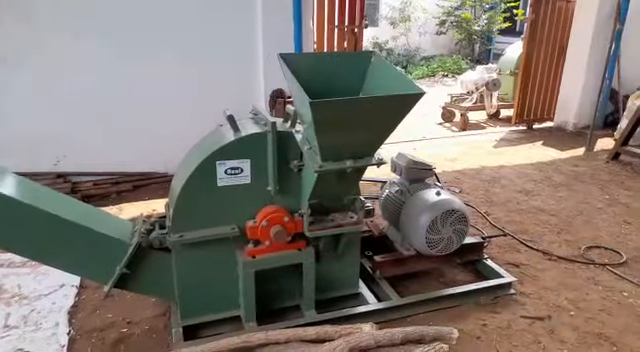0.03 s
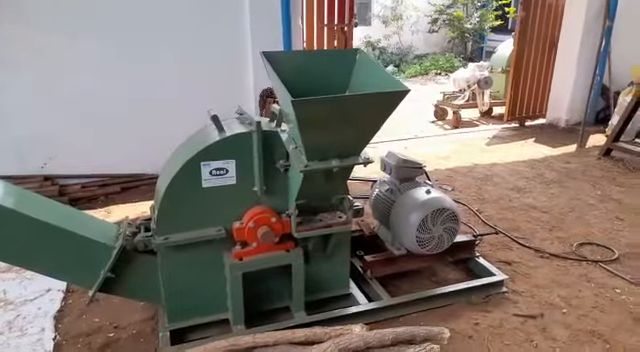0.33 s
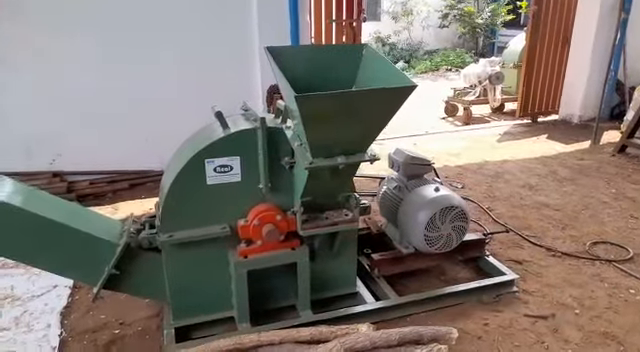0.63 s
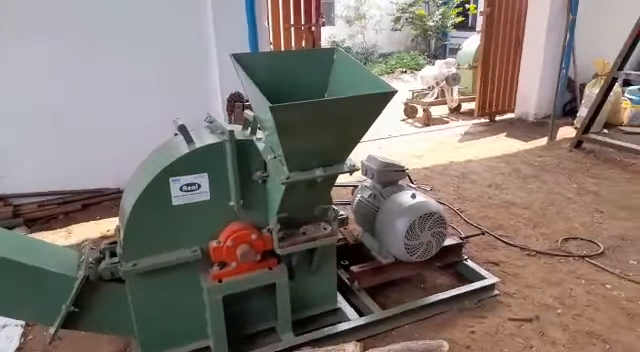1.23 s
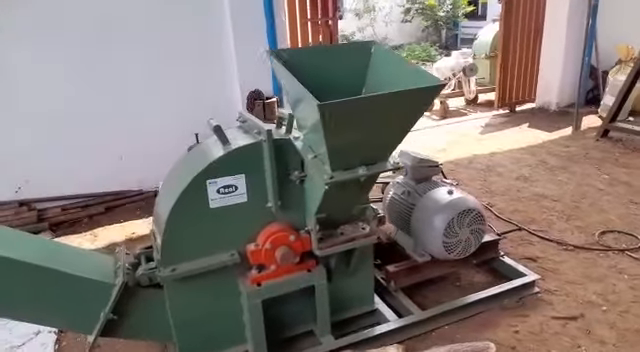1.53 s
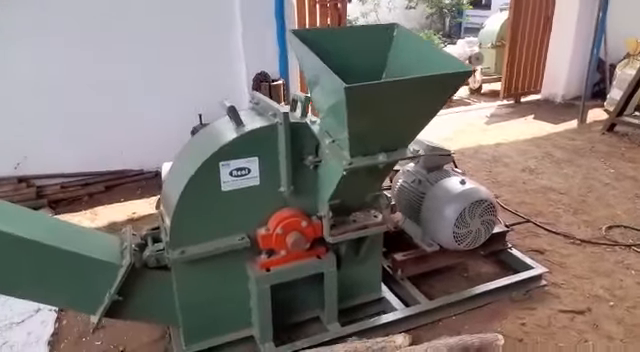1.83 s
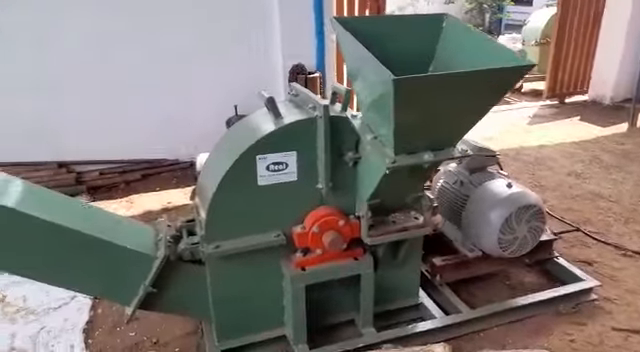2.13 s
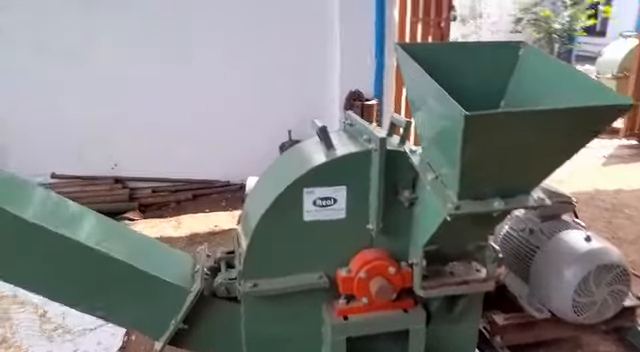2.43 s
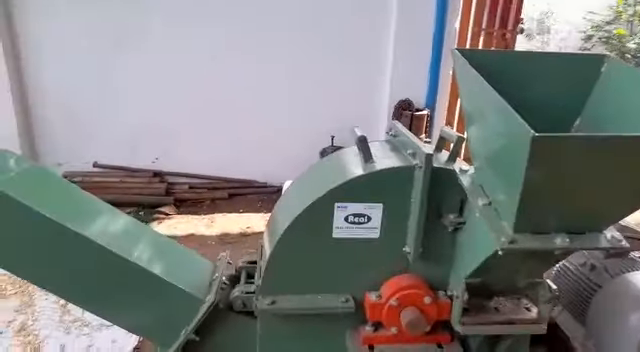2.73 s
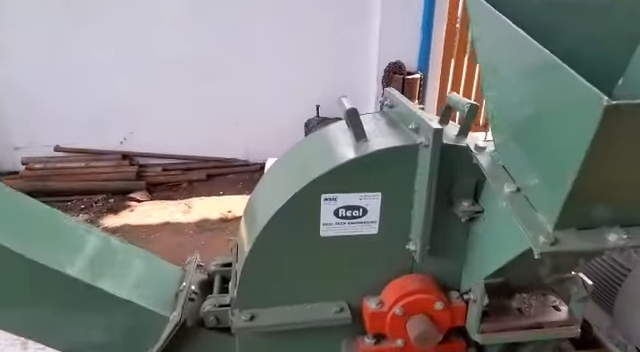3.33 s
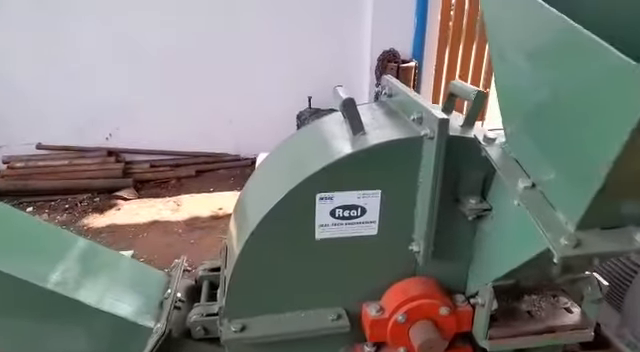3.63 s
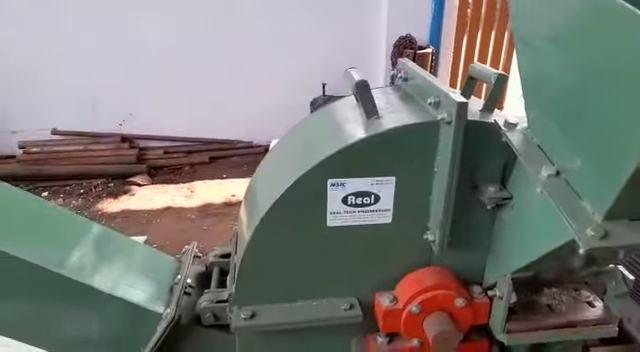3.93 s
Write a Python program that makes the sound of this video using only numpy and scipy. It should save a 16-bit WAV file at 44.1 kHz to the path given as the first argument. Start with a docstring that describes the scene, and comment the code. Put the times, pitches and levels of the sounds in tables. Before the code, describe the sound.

An idling wood crusher buzzes and hums without a break outdoors, with a rush of air and short wall echoes. Its pitch sinks slightly while whining, ringing overtones come and go and the microphone approaches.

```python
"""A throbbing, buzzing drone over rushing air: a belt-driven wood crusher runs empty in a walled yard.
Each rotor blade sends a sharp pressure dip through the steel housing, whose resonances swell as the
rotor slowly loses speed and its harmonics slide past. Shaft and belt hum, the casing booms, and a
bright tick and a puff of hiss ride on every blade. As the listener walks up, overtones whine and fade
and single panels ring out, while the walls echo the pulses and scatter the treble."""
import sys
import numpy as np
from scipy import signal
from scipy.fft import rfft, irfft
from scipy.io import wavfile
from scipy.ndimage import uniform_filter1d, minimum_filter1d, map_coordinates

SR = 44100
rng = np.random.default_rng(int(sys.argv[2]) if len(sys.argv) > 2 else 0)


def generate_wav(signal):
    """Clip the signal to [-1, 1] and save it as 16-bit WAV at the path in sys.argv[1]."""
    frames = np.transpose(np.atleast_2d(signal))
    scaled = np.clip(frames, -1, 1) * 32767
    pcm = np.round(scaled).astype(np.int16)
    wavfile.write(sys.argv[1], SR, pcm)


N = 176400
T = np.arange(N) / SR
FFT_SIZE = 65536
FREQS = np.arange(FFT_SIZE // 2 + 1) * SR / FFT_SIZE
BLADES, BLADE_HZ, SAG_HZ_PER_S, FIRST_PASS_S = 2, 64.23, 1.296, .0074

# All levels are relative: the walk's level rides the whole mix.
# the walk up to the machine (t/s, nearness 0-1, level/dB)
WALK_UP = [(0, 0, -0.5), (.6, 0.13, 0.5), (1.3, 0, 0.67), (2.1, 0, -0.5), (2.6, 0.27, 0), (3.2, 0.67, 1.53),
           (4, 0.98, -0.5)]
# tone of the direct blade pulses (f/Hz, level/dB)
BLADE_COLOUR = [(30, -44), (60, -31.5), (125, -25), (185, -28.5), (260, -28), (420, -26.5), (500, -24.5),
                (620, -28.5), (900, -44), (1400, -44), (2300, -54.5), (3400, -65.5), (4800, -75),
                (6500, -91), (10000, -102)]
# peaks and notches of housing and chute (f/Hz, width/Hz, level/dB)
HOUSING_MODES = [(254.2, 12.5, 12), (302.8, 3, -13.5), (304.3, 11.1, 13), (319.5, 2.5, -3), (357.1, 4.9, 9),
                 (380.2, 5.1, 6.5), (457, 16, 15), (477.8, 3.5, 5), (515.8, 7.2, -14), (568.3, 10.5, -18.5),
                 (573.2, 16, 12), (600, 37.4, -11), (615.1, 16.3, 14), (694, 8, 6.5), (730, 12, 5),
                 (779, 3, -15.5), (793, 6.7, -0.5), (915, 4.6, -4.5), (1112, 75, 2)]
# EQ on the direct pulses close to the machine (f/Hz, level/dB)
CLOSE_EQ = [(60, 7.5), (125, 4), (185, 7.5), (250, 6.5), (320, -12.5), (370, 3.5), (430, 3), (490, -1),
            (680, 0.5), (950, -2), (1500, 2.5), (2300, -9.5), (4000, -11)]
# hum of shaft and belt (multiple of the rotor speed, far level/dB, near level/dB)
DRONE_PARTIALS = [(3, -33.5, -41.5), (5, -35.5, -30), (7, -32.5, -30), (7.5, -37.5, -29.5),
                  (8.5, -31, -30.5), (9, -31.5, -25), (9.5, -52, -40), (10.5, -38.5, -32.5),
                  (11, -48.5, -40.5), (13, -35.5, -28.5), (15, -36.5, -60), (19, -45.5, -30)]
# tone of the rushing air (f/Hz, level/dB)
AIR_COLOUR = [(25, -23), (80, -6.5), (180, 4.5), (300, 0.5), (420, -2), (650, -5.5), (1000, -8.5),
              (1500, -12), (2300, -14), (3300, -27), (4600, -25), (6300, -40), (9000, -45), (10500, -51.5),
              (13500, -47), (16000, -59)]
# resonances of the hollow casing (f/Hz, width at -6 dB/Hz, level/dB)
CAVITY_MODES = [(123.8, 13.6, -28.5), (259, 25, -34)]
# fader of the blade tick (t/s, level/dB)
TICK_FADER = [(0, -55), (1.3, -58), (2.45, -55), (2.95, -49.5), (3.4, -51.5), (4, -49.5)]
# fader of the gritty hiss (t/s, level/dB)
GRIT_FADER = [(0, -69), (.15, -56), (.27, -65.5), (.47, -58.5), (.62, -69), (1.7, -67.5), (2.4, -62),
              (2.9, -61.5), (3.25, -64), (3.5, -68), (4, -64)]
# tone of that hiss (f/Hz, level/dB)
GRIT_EQ = [(2000, -21.5), (6000, -3), (9000, 2.5), (10500, -3.5), (12500, -2), (15700, -7.5)]
# tone of the pulses scattered by panels and walls (f/Hz, level/dB)
SCATTER_COLOUR = [(40, -71.5), (120, -52), (250, -46.5), (420, -36), (650, -41), (1000, -38.5),
                  (1400, -42.5), (2300, -46), (3300, -58), (4700, -62.5), (6500, -77.5), (10000, -100)]
# slap off the wall along the walk (t/s, delay/s, level/dB)
SLAP_PATH = [(0, .0087, -11.5), (1.3, 0.0097, -6), (2.4, .0105, -4.5), (3.0, .0117, 2), (3.4, .0121, 0.5),
             (4, 0.013, 2)]
# tone of that slap (f/Hz, level/dB)
SLAP_COLOUR = [(100, -67), (400, -46.5), (800, -43.5), (1300, -45), (1900, -51), (2600, -52.5),
               (4000, -83.5), (10000, -105)]
# blade overtones that swell into a whine (peak t/s, rough f/Hz, fade to 1/e in s, level/dB)
WHINE_SWELLS = [(0.105, 1154, 0.28, -36), (0.304, 1915, 0.29, -38), (0.348, 2745, 0.46, -45.5),
                (.45, 764, 0.85, -32.5), (.75, 1202, .4, -35.5), (0.847, 1010, 0.28, -37.5),
                (1.09, 2324, 0.16, -37.5), (1.16, 1316, 0.25, -50), (1.24, 688, 0.31, -27.5),
                (1.23, 2380, 0.065, -43.5), (1.264, 1126, .5, -33.5), (1.398, 1185, 0.14, -39.5),
                (1.427, 1746, 0.53, -38.5), (1.542, 1683, 0.2, -36), (1.7, 867, .22, -28.5),
                (2.02, 1232, 0.24, -46), (2.138, 1353, 0.35, -30), (2.146, 430, 1, -34.5),
                (2.598, 791, 0.11, -36), (2.71, 1032, 0.16, -35.5), (2.684, 1581, 0.11, -35),
                (2.904, 1693, 0.13, -38), (3.34, 1677, .15, -36), (3.87, 1362, .14, -34.5),
                (3.867, 1125, 0.17, -34), (3.384, 957, 0.38, -35), (3.374, 1256, 0.38, -34.5),
                (3.657, 892, 0.43, -27.5)]
# ringing panels (peak t/s, f/Hz, width/Hz, fade to 1/e in s, level/dB, share of air noise 0-1)
PANEL_SWELLS = [(0.201, 3160, 900, 0.42, -42.5, 0.5), (1.15, 2346, 70, 0.18, -39.5, 0),
                (1.505, 2420, 110, 0.097, -39, 0), (1.92, 4600, 460, .22, -46, 0.4),
                (3.003, 4780, 398, .3, -52, .25), (2.595, 804, 330, 0.18, -28.5, 0.7),
                (2.952, 1170, 400, 0.34, -30, 0.5), (3.05, 2590, 119, .22, -41, .12),
                (3.13, 2350, 130, 0.12, -48, 0.5), (3.494, 2520, 131, .13, -41.5, 0.2),
                (3.877, 2380, 170, .16, -36.5, 0.5)]


def amp(db):
    """Decibels to gain."""
    return 10 ** (np.asarray(db) / 20)


def unit(x):
    """Scale to rms 1."""
    return x / np.sqrt(np.mean(x ** 2))


def curve(table, column=1):
    """One column of a time table at every sample."""
    rows = np.array(table)
    return np.interp(T, rows[:, 0], rows[:, column])


def eq(points):
    """Decibels at every frequency, from points on a log axis."""
    rows = np.array(points)
    return np.interp(np.log(FREQS + 1), np.log(rows[:, 0]), rows[:, 1])


def bell(hz, width_hz):
    """Resonance curve: 1 at its centre, a half at the edges of its width."""
    return 1 / (1 + ((FREQS - hz) / (width_hz / 2)) ** 2)


def response(db):
    """Minimum-phase impulse response of an EQ curve."""
    cepstrum = irfft(np.log(amp(db)))
    cepstrum[1:FFT_SIZE // 2] *= 2
    cepstrum[FFT_SIZE // 2 + 1:] = 0
    return irfft(np.exp(rfft(cepstrum)))[:FFT_SIZE // 2]


def through(x, ir):
    """Filter a sound, keeping the last N samples so that any pre-roll drops away."""
    return signal.fftconvolve(x, ir)[len(x) - N:len(x)]


def noise(db):
    """Steady noise with the given colour."""
    return through(rng.standard_normal(N + FFT_SIZE // 2), response(db))


def wander(hz):
    """Smooth random motion with a spread near 1."""
    steps = rng.standard_normal(256)
    return map_coordinates(steps, [T * hz + 2], order=3, mode="mirror")


def swell(peak_s, fade_s):
    """Bell-shaped fade in and out."""
    return np.exp(-((T - peak_s) / fade_s) ** 2)


def passes(t):
    """Number of blade passes so far, as the rotor slows."""
    return BLADE_HZ * (t - FIRST_PASS_S) - SAG_HZ_PER_S * t ** 2 / 2


def blade_pulses(spread_db=0.12):
    """A pressure dip per blade, with a second of pre-roll; and the same train with alternating sign."""
    phase = passes(np.arange(-SR, N) / SR)
    number = np.arange(np.ceil(phase[0]) + 1, np.floor(phase[-1]) + 1)
    at = np.interp(number, phase, np.arange(len(phase)))
    dips = -amp(spread_db * rng.standard_normal(len(at))) * SR / BLADE_HZ / np.sqrt(2)
    signs = np.array([np.ones(len(at)), (-1) ** number])
    trains = np.zeros((2, len(phase) + 1))
    for step, share in ((0, 1 - at % 1), (1, at % 1)):  # each dip straddles two samples
        trains[:, at.astype(int) + step] += share * dips * signs
    return trains[:, :-1]


def housing(pulses):
    """The pulses ring the steel housing; the bass fattens close to the machine."""
    colour = eq(BLADE_COLOUR) + sum(db * bell(hz, width) for hz, width, db in HOUSING_MODES)
    far = through(pulses, response(colour))
    close = through(pulses, response(colour + eq(CLOSE_EQ)))
    nearness = curve(WALK_UP)
    return (1 - nearness) * far + nearness * close


def chute(x, hz=333, width_hz=31):
    """One band lingers in the chute and comes out late, at the same level."""
    b, a = signal.iirpeak(hz, hz / width_hz, fs=SR)
    return x - 2 * signal.lfilter(b, a, x)


def belt_drone(waver_db=0.3, waver_hz=1.4):
    """Shaft and belt hum in wavering partials between the blade harmonics."""
    turns, nearness, out = passes(T) / BLADES, curve(WALK_UP), 0
    for multiple, far_db, near_db in DRONE_PARTIALS:
        db = far_db + (near_db - far_db) * nearness + waver_db * wander(waver_hz)
        out += np.sqrt(2) * amp(db) * np.sin(2 * np.pi * multiple * turns)
    return out


def air_rush(level_db=-27.5, surge_depth=0.13, wide_above_hz=700):
    """Air rushes through the casing, surging with each blade; the treble is wide."""
    colour = eq(AIR_COLOUR)
    mid = noise(colour)
    side = noise(colour - 10 * np.log10(1 + (wide_above_hz / (FREQS + 1)) ** 2))
    surge = 1 + surge_depth * np.cos(2 * np.pi * passes(T))
    return amp(level_db) * unit(np.array([mid + side, mid - side]) * surge)


def cavity_boom(close_db=-1):
    """Turbulence booms in the hollow casing, a touch softer close up."""
    boom = 0
    for hz, width_hz, db in CAVITY_MODES:
        band = noise(20 * np.log10(bell(hz, width_hz) + 1e-6))
        boom += amp(db) * unit(band)
    return boom * amp(close_db * curve(WALK_UP))


def blade_ticks(pulses, hz=4680, width_hz=1440, flicker_db=1.5, left_over_right_db=10):
    """A bright metallic tick off to the left as each blade passes, never twice the same strength."""
    ring = response(40 * np.log10(bell(hz, width_hz)))  # width at -12 dB
    ticks = unit(through(pulses, ring) * amp(flicker_db * wander(BLADE_HZ)))
    pan = amp(np.array([[1], [-1]]) * left_over_right_db / 2)
    return amp(curve(TICK_FADER)) * ticks * pan


def grit(grain_spread_db=5.5, puff_height=1.2, puff_decay_passes=.25):
    """Fine grainy hiss, like dust blown through the casing, in a puff after each blade."""
    grains = rng.standard_normal((2, N)) * amp(grain_spread_db * rng.standard_normal(N))
    puff = 1 + puff_height * np.exp(-(passes(T) % 1) / puff_decay_passes)
    colour = response(eq(GRIT_EQ))
    hiss = np.array([through(ear * puff, colour) for ear in grains])
    return amp(curve(GRIT_FADER)) * unit(hiss)


def yard_scatter(pulses, spots=5, spot_s=1.33, decay_s=0.045):
    """Dense short reflections off panels and walls, different at each ear and each spot of the walk."""
    age, out = T[:FFT_SIZE // 8], np.zeros((2, N))
    coloured = signal.fftconvolve(pulses, response(eq(SCATTER_COLOUR)))[:len(pulses)]
    place = np.minimum(T / spot_s, spots - 1)
    for spot in range(spots):
        crossfade = np.cos(np.pi / 2 * np.clip(place - spot, -1, 1))
        for ear in range(2):
            tail = rng.standard_normal(len(age)) * np.exp(-age / decay_s)
            out[ear] += crossfade * through(coloured, tail / np.linalg.norm(tail))
    return out


def wall_slap(pulses):
    """Each blade pulse slaps back off the wall; the delay slides as the listener walks."""
    slap = through(pulses, response(eq(SLAP_COLOUR)))
    late = map_coordinates(slap, [(T - curve(SLAP_PATH)) * SR], order=1, mode="nearest")
    return -late * amp(curve(SLAP_PATH, column=2))


def whines():
    """Single blade overtones sing out for a moment as the speed and the listening spot change."""
    phase, out = passes(T), 0
    for peak_s, hz, fade_s, db in WHINE_SWELLS:
        harmonic = np.round(hz / (BLADE_HZ - SAG_HZ_PER_S * peak_s))
        tone = np.sqrt(2) * np.sin(-2 * np.pi * harmonic * phase)
        out += amp(db) * swell(peak_s, fade_s) * tone
    return out


def panel_rings(pulses):
    """Blades and turbulence ring single panels, each loudest as the listener passes its sweet spot."""
    drive, out = np.vstack([pulses[-N:], rng.standard_normal((2, N))]), 0
    for peak_s, hz, width_hz, fade_s, db, air_share in PANEL_SWELLS:
        b, a = signal.iirpeak(hz, hz / width_hz, fs=SR)
        rung = signal.lfilter(b, a, signal.lfilter(b, a, drive + 1e-18))
        struck, blown = unit(rung[0]), unit(rung[1:])
        panel = np.sqrt(1 - air_share) * struck + np.sqrt(air_share) * blown
        out += amp(db) * swell(peak_s, fade_s) * panel
    return out


def lean_right(x, right_over_left_db=2.5, above_hz=140):
    """Pan a little to the right, leaving the bass in the centre."""
    upper = signal.sosfilt(signal.butter(1, above_hz, "high", fs=SR, output="sos"), x)
    pan = amp(np.array([[-1], [1]]) * right_over_left_db / 2)
    return x + upper * (pan - 1)


def turn_away(stereo, turn_s=(2.05, 2.8), lag_s=.00018):
    """The listener turns, putting the machine to the right, so the left ear hears it late."""
    lag = np.interp(T, turn_s, [0, lag_s])
    left = map_coordinates(stereo[0], [(T - lag) * SR], order=3, mode="nearest")
    return np.array([left, stereo[1]])


def scene(blade_mismatch_db=-7.5):
    """The crusher and its yard in stereo, heard along the walk."""
    pulses, alternating = blade_pulses()
    buzz = chute(housing(pulses) + whines())
    machine = lean_right(buzz + belt_drone() + cavity_boom() + wall_slap(pulses))
    # the two blades are not alike, so the reflections throb once a turn
    yard = yard_scatter(pulses) + amp(blade_mismatch_db) * yard_scatter(alternating)
    mix = machine + yard + blade_ticks(pulses) + air_rush() + panel_rings(pulses) + grit()
    return turn_away(mix) * amp(curve(WALK_UP, column=2))


def record(dry, top_hz=15700):
    """A fast limiter catches the peaks, then a steep low-pass shaves off the top."""
    peak = np.abs(dry).max(axis=0)
    needed = np.minimum(1, 1 / (peak + 1e-9))
    held = minimum_filter1d(needed, size=257)
    gain = uniform_filter1d(uniform_filter1d(held, size=129), size=129)
    low_pass = signal.ellip(8, .2, 70, top_hz, fs=SR, output="sos")
    return signal.sosfilt(low_pass, dry * gain)


dry = scene()
out = record(dry)
generate_wav(out)
```